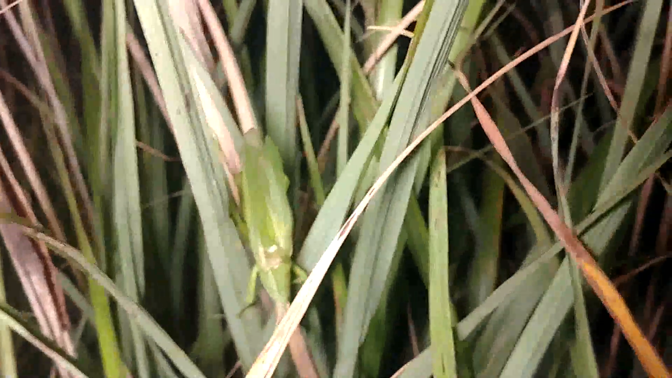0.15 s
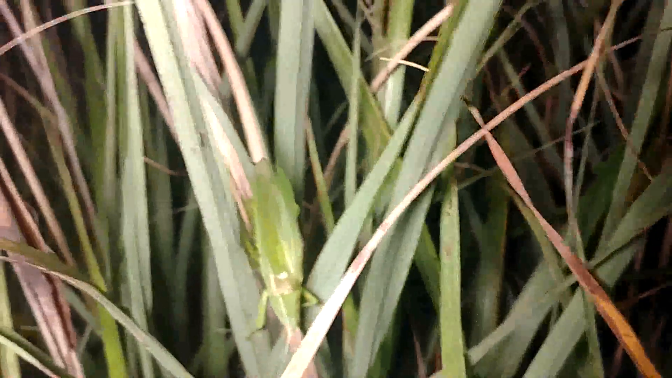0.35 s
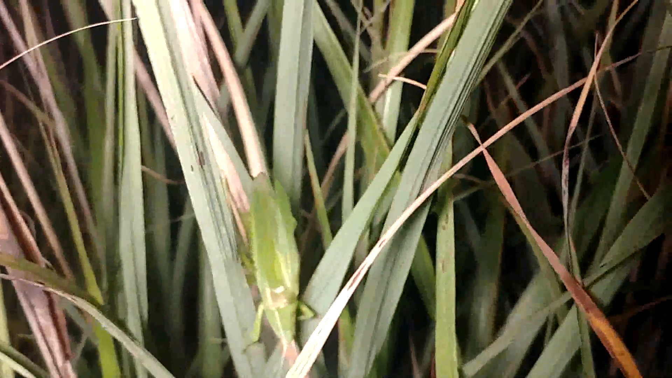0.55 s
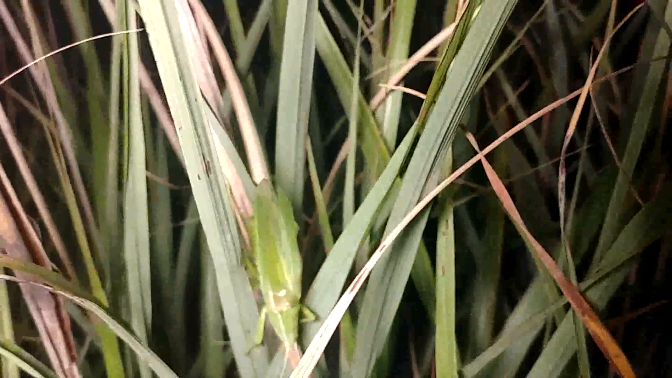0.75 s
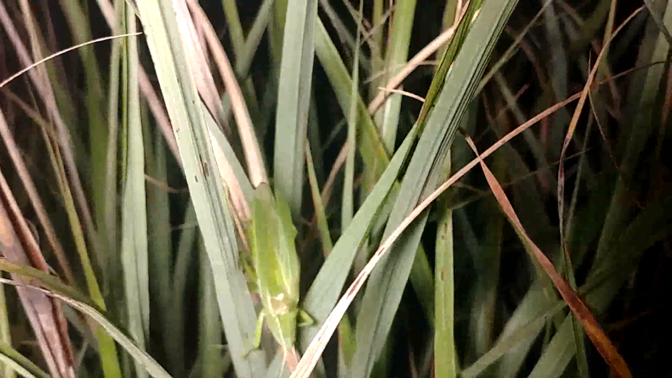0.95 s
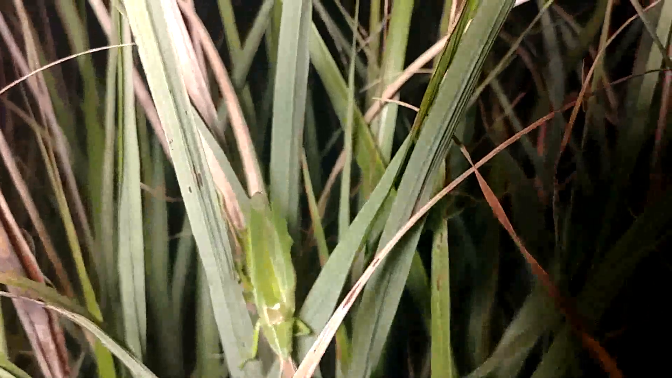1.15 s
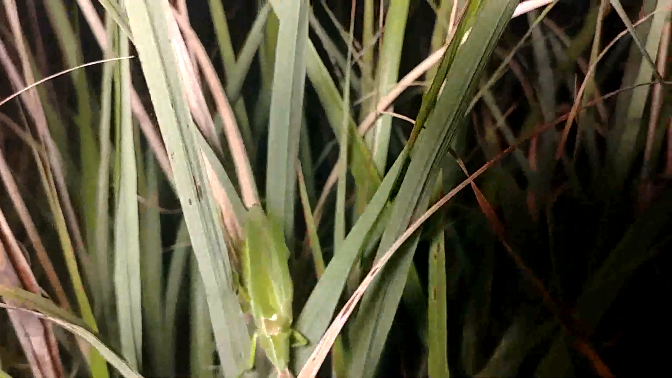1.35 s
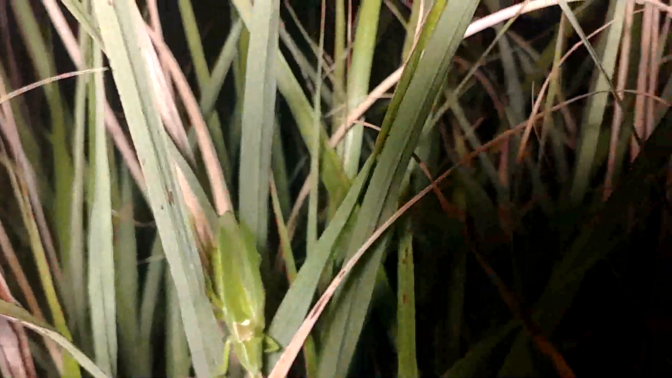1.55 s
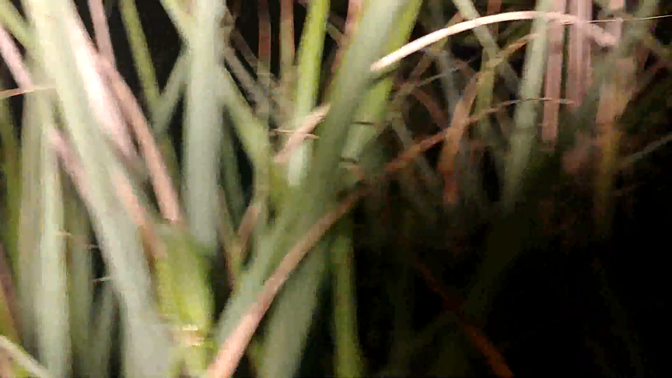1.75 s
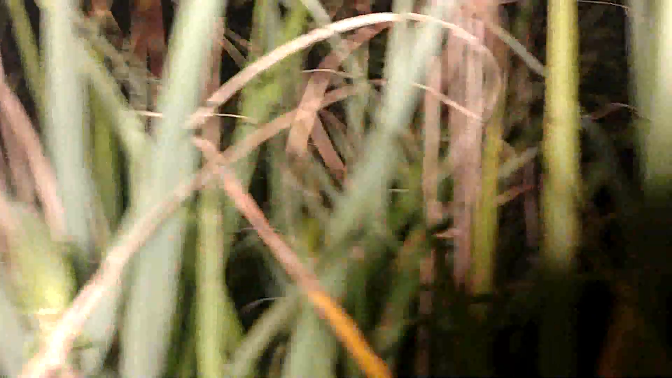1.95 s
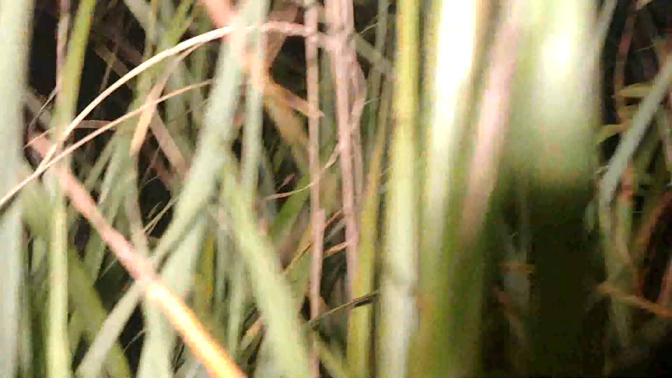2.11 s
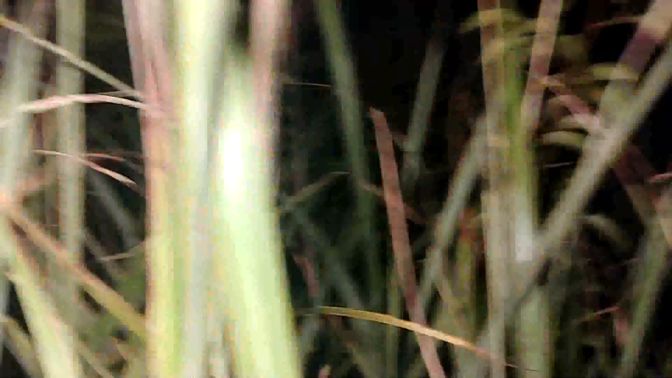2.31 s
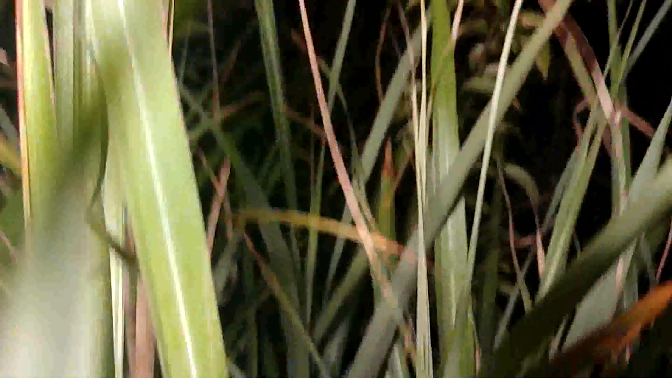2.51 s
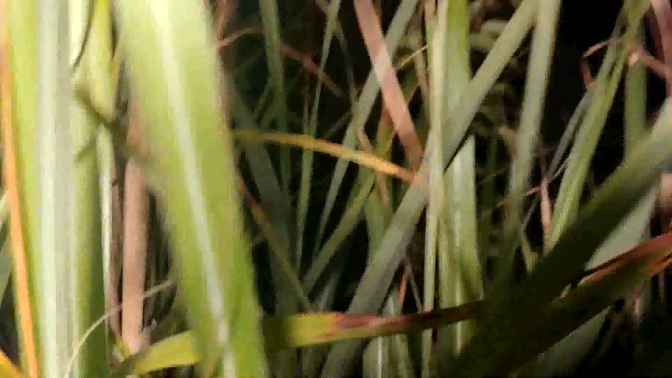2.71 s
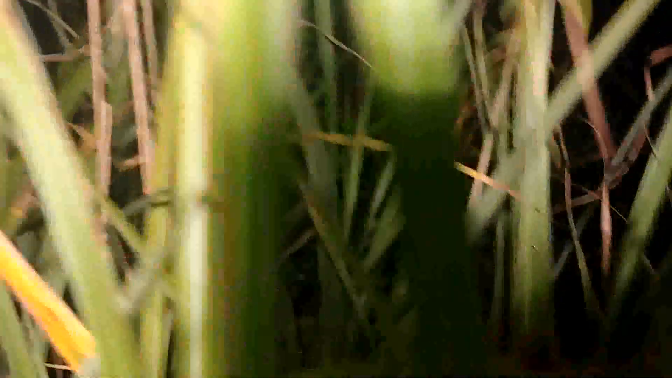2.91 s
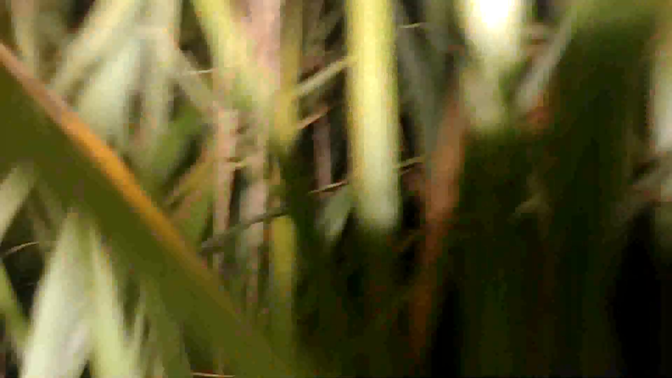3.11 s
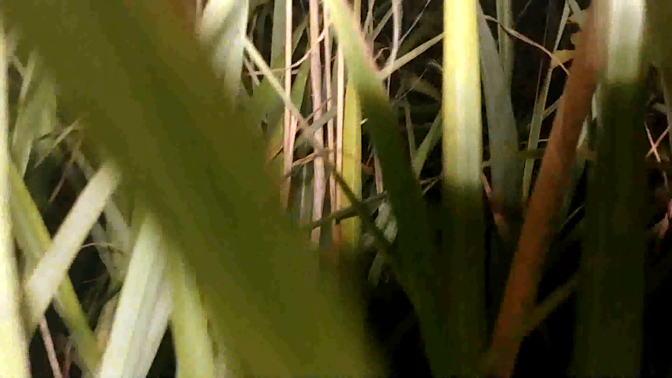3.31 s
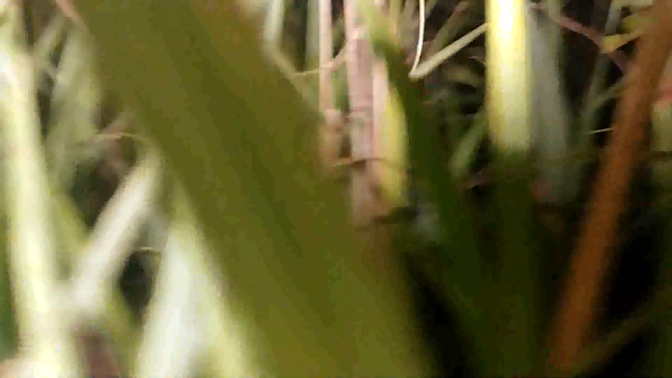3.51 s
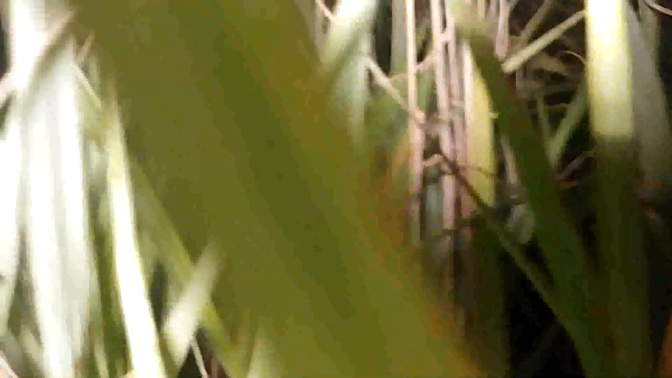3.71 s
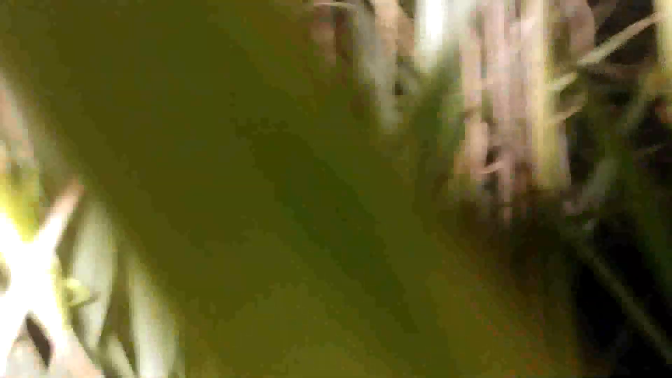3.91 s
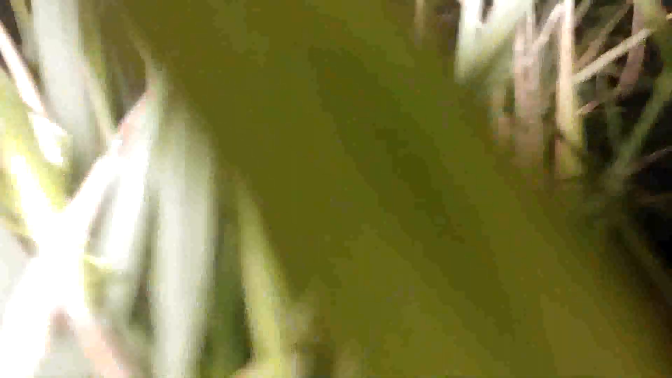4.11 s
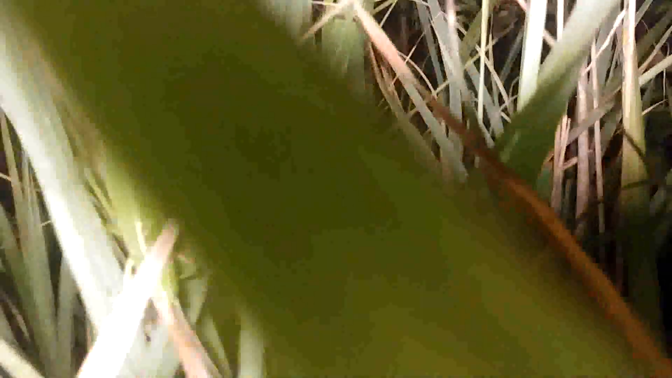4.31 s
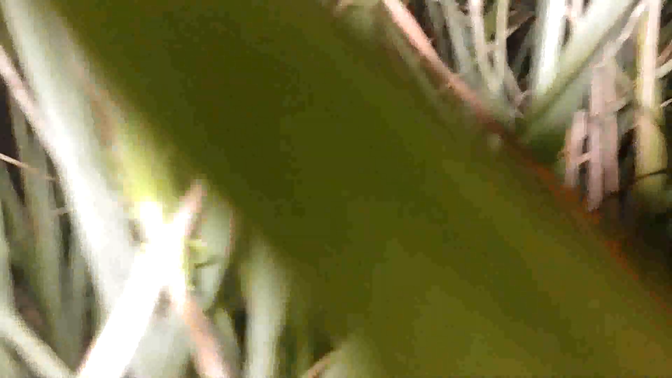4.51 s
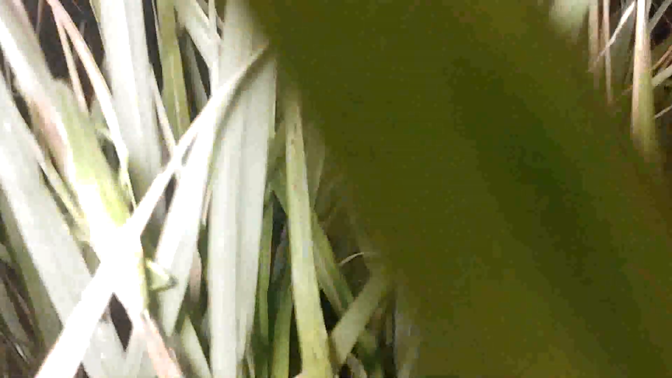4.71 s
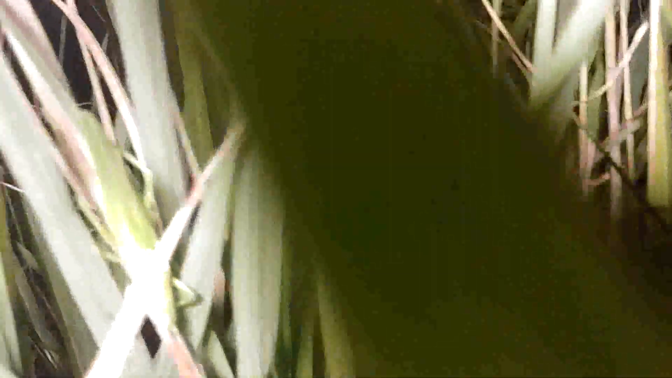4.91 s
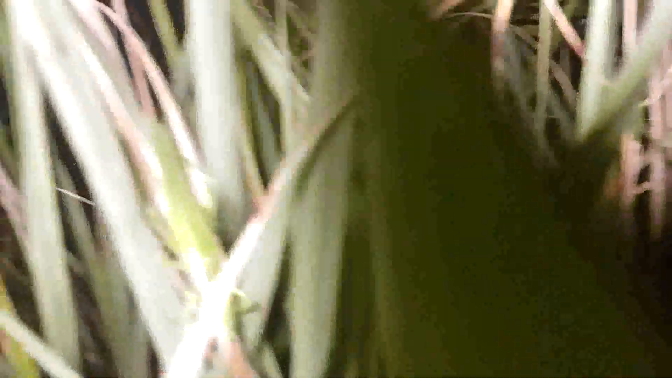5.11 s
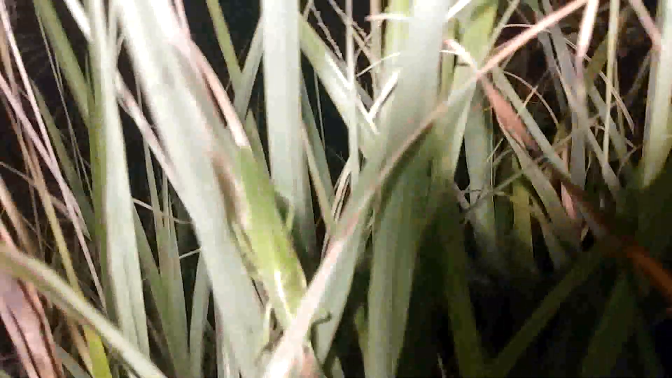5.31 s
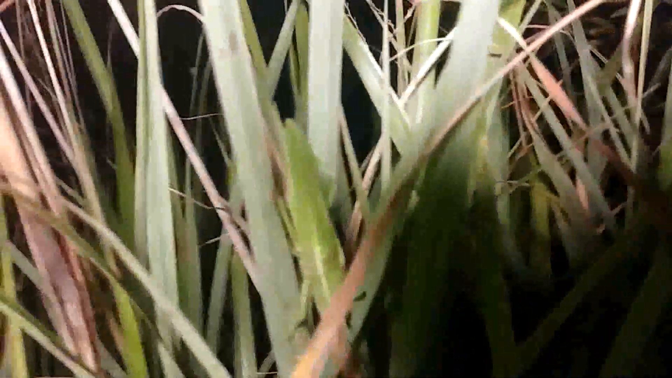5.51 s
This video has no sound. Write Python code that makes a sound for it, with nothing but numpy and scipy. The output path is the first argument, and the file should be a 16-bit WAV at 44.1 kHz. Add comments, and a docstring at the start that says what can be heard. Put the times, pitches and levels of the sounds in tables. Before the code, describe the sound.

A dazzlingly loud, shrill katydid rattle fills the first three seconds, dry and close, coloured by moving grass blades and a buzzing low hum. It quits abruptly with a hand bump and a brief ring in the grass. Much quieter night remains: far katydids shimmering and fading, crickets chirping, a throbbing lower trill, a few tiny far yelps and soft handling bumps on the swaying stereo microphones.

```python
"""A large katydid buzzes close by in tall grass at night while the pair of microphones swings away.
Each wing stroke is a mostly falling chirp echoed by leaves, with noise for the scraper and a summed-cosine hum.
The wings run down and stop at 3.27 s with a bump of the hand; two damped rings make a last twitch at 3.6 s.
What remains is a fading katydid chorus of filtered noise, gliding-sine crickets, a throbbing trill,
a few far yelps of two partials, grass brushes and bumps, over the filtered noise of the night air."""
import sys
import numpy as np
from scipy import signal
from scipy.fft import rfft, irfft
from scipy.io import wavfile
from scipy.ndimage import uniform_filter1d, map_coordinates

SR = 44100
rng = np.random.default_rng(int(sys.argv[2]) if len(sys.argv) > 2 else 0)


def wav_out(sig):
    """Save sig, one row per channel (or a flat mono array), as 16-bit PCM at SR to the path in sys.argv[1]."""
    wavfile.write(sys.argv[1], SR, np.round(np.clip(np.atleast_2d(sig).T, -1, 1) * 32767).astype(np.int16))


N = 244755
TIME = np.arange(N) / SR
STOP = 3.274  # s, the wings stop
WING_RATE = 168.6  # strokes per second before falters, run-down and jitter
# the microphones swing away from the insect: time_s, right_microphone_lag_ms
SWING = [(0, .081), (.25, .08), (.45, .074), (1.3, .074), (1.68, .07), (1.8, .085), (1.92, .116),
         (2.0, .152), (2.15, .2), (2.3, .208), (2.38, .236), (2.53, .31), (2.8, .347), (3.05, .34),
         (3.2, .285)]
# bumps of the holding hand: start_s, envelope_time_s, relative_rub_db, ring_db, ring_hz
BUMPS = [(3.275, 0.016, -37, -33.5, 66), (5.02, 0.037, -53.5, -49, 80), (5.355, 0.042, -46.5, -44, 84)]


def gain_of(db):
    """Level definition: decibels to an amplitude factor."""
    return 10 ** (np.asarray(db) / 20)


def evened(x):
    """Normalization: scales to rms 1."""
    return x / np.sqrt(np.mean(x ** 2) + 1e-20)


def follow(rows, at=TIME):
    """Linear interpolation: the columns of a table as curves over its first column."""
    position, *columns = np.transpose(rows)
    return [np.interp(at, position, column) for column in columns]


def colour(x, points):
    """Spectral shaping: filters by a response over log frequency, then scales to rms 1."""
    hz, db = np.transpose(points)
    shape = np.interp(np.log(np.fft.rfftfreq(N, 1 / SR) + 1), np.log(hz), db)
    return evened(irfft(rfft(x) * gain_of(shape), N))


def noise():
    """Incoherence: white noise, independent left and right."""
    return rng.standard_normal((2, N))


def wander(cutoff_hz):
    """Band limitation: noise below a cutoff makes a random fluctuation of rms 1."""
    spectrum = rfft(rng.standard_normal(N))
    return evened(irfft(spectrum * (np.fft.rfftfreq(N, 1 / SR) < cutoff_hz), N))


def tone(hz):
    """Phase accumulation: a sine that follows a pitch curve."""
    return np.sin(2 * np.pi * np.cumsum(hz) / SR)


def arch(start, length):
    """Half-sine envelope: a smooth swell of height 1."""
    return np.sin(np.pi * np.clip((TIME - start) / length, 0, 1))


def cycle_bump(turns, at, width):
    """Periodic gating: a Gaussian bump at one point of every wing cycle."""
    return np.exp(-(((turns - at + .5) % 1 - .5) / width) ** 2)


def delayed(x, delay_s, order=3):
    """Propagation delay: reads a signal late by a possibly varying time, with spline interpolation."""
    return map_coordinates(x, [np.arange(N) - delay_s * SR], order=order)


def scatter(x, decay):
    """Diffuse scattering: dense echoes off the grass, different for each ear, dying exponentially."""
    t = np.arange(SR // 5) / SR
    tail = rng.standard_normal((2, len(t))) * np.exp(-t / decay)
    return signal.fftconvolve(np.atleast_2d(x), tail / np.linalg.norm(tail[0]), axes=1)[:, :N]


def add(mix, s, sound):
    """Superposition: lays a sound into the mix at a time."""
    part = mix[round(s * SR):][:len(sound)]
    part += sound[:len(part)]


def katydid(grass_db=-17, field_db=-21):
    """Stridulation: one wing cycle drives catch, chirp, rasp and hum; the grass rings briefly after the stop."""
    turns = np.cumsum(wing_rate() * (1 + .006 * wander(80))) / SR
    sounding = np.clip((STOP - TIME) / 0.006, 0, 1)
    scrape = (graze(catch(turns) + rasp(turns)) + hum(turns)) * sounding
    chirps = (chirping(turns) + sheen(turns)) * sounding
    # the broad scrape spreads into the grass more than the beamed chirp
    near_grass = gain_of(grass_db) * scatter(4.27 * scrape + 1.13 * chirps, decay=0.013)
    field = gain_of(field_db) * scatter(chirps, decay=0.057)
    return scrape + chirps + near_grass + field


def wing_rate(run_down_s=0.079, run_down_rate=57):
    """Frequency modulation: a steady beat, less the falters and the final run-down in strokes per second."""
    # the wings falter and recover: start_s, length_s, lost_strokes_per_s
    falters = [(2.251, 0.17, 14), (2.333, 0.42, 5.5), (2.656, 0.75, 2.2)]
    run_down = np.clip(1 - (STOP - TIME) / run_down_s, 0, 1)
    lost_rate = sum(lost * arch(s, length) for s, length, lost in falters)
    return WING_RATE - lost_rate - run_down_rate * run_down


def chirping(turns, song_db=-9.5, tilt_db=4, perch_db=-22, facing_db=-26, averted_db=-14):
    """Comb interference: each microphone has its own tilt and ridges; off axis the side echoes grow."""
    # a blade beside each microphone combs the song: time_s, left_dip_hz, left_echo_share,
    # left_added_tilt_db_per_octave, right_dip_hz, right_echo_share, right_added_tilt_db_per_octave
    blade_curves = [(0, 8740, 0.083, -7, 8850, 0.17, 3), (.3, 8800, 0.22, -12, 9000, 0.11, 7),
                    (1.0, 8620, 0.4, -16, 8800, 0.11, 10), (1.2, 8500, 0.14, 2, 8450, 0.14, 12),
                    (1.45, 8580, 0.16, -9.5, 8800, 0.16, 12), (1.7, 8440, 0.37, -7, 8900, 0.34, -1),
                    (1.92, 8570, 0.17, 0, 8670, 0.17, -8), (2.03, 8370, 0.29, 8, 8600, 0.35, -1),
                    (2.25, 8600, 0.19, -5, 8960, 0.53, -6), (2.38, 8550, 0.15, -7, 8830, 0.18, -3),
                    (2.5, 8500, 0.13, -7, 9100, 0.39, -25), (2.72, 9140, 0.098, -11, 9000, 0.13, -19),
                    (2.95, 8160, 0.15, -9, 8420, 0.24, -16), (3.12, 8580, 0.23, -7, 8334, .42, -21),
                    (3.27, 9100, .15, 2, 8350, .25, -26)]
    hz, chirps = strokes(turns, jitter_hz=22.1, size_db=.5)
    octaves = np.log2(hz / 8500)
    controls = np.reshape(follow(blade_curves), (2, -1, N))
    echo_db = facing_db + (averted_db - facing_db) * averted()
    out = []
    for side, (dip_hz, share, tilt) in zip(microphones(leaves(chirps.real, perch_db)), controls):
        ridged = blade(side * gain_of((tilt_db + tilt) * octaves), dip_hz, share)
        level_db = song_db + 0.4 * wander(4.0)
        out.append(leaves(ridged, echo_db) * gain_of(level_db))
    return np.array(out)


def strokes(turns, jitter_hz, size_db):
    """Tooth-by-tooth excitation: pitch is the tooth rate, and every stroke has its own phase, pitch and size."""
    # one stroke of scraper over file: cycle_share, tooth_rate_hz, relative_level_db
    stroke = [(0, 9512, -25), (.06, 9516, -7), (.15, 9359, 0.5), (.24, 8859, -1.5), (.32, 8180, -1.5),
              (.42, 7918, -3), (.52, 7820, -12), (.62, 8168, -24), (.72, 8179, -28), (.86, 8038, -11.5),
              (1, 8497, -14.5)]
    index = turns.astype(int)
    start, detune, size = rng.standard_normal((index[-1] + 1, 3))[index].T
    hz, db = follow(stroke, turns % 1)
    hz = hz + jitter_hz * detune
    phase_turns = np.cumsum(hz) / SR + start
    return hz, gain_of(db + size_db * size) * np.exp(2j * np.pi * phase_turns)


def leaves(chirps, echo_db, far_ms=2.8, drift_ms=0.039):
    """Multipath reflection: five echoes drift as the hand moves; a running rms evens the level."""
    paths_ms = [ms + drift_ms * wander(1.5) for ms in np.linspace(far_ms / 2, far_ms * 2, 5)]
    echo = delayed(chirps, np.array(paths_ms) / 1000).sum(0)
    heard = chirps + gain_of(echo_db) * echo
    return heard / np.sqrt(uniform_filter1d(heard ** 2, size=2100) + 1e-9)


def blade(x, dip_hz, share, order=9):
    """Destructive interference: an echo 9.5 periods late makes a dip with a ridge on either side."""
    return x + share * delayed(x, (order + .5) / dip_hz)


def microphones(x):
    """Arrival-time difference: the right microphone hears the insect later and with opposite sign."""
    return np.array([x, -delayed(x, follow(SWING)[0] / 1000, order=5)])


def averted(facing_ms=0.075, averted_ms=0.35):
    """Direction from time lag: how far the microphones have turned off the insect, 0-1."""
    return np.clip((follow(SWING)[0] - facing_ms) / (averted_ms - facing_ms), 0, 1)


def sheen(turns, sheen_db=-22.5, averted_db=-14, floor=0.56, at=0.87, width=0.2):
    """Resonance and directivity: strokes shake the wing's upper resonance, which fades off axis."""
    # the upper resonance, beamed straight ahead: frequency_hz, relative_density_db_per_hz
    resonance = [(11000, -64), (13300, -17), (14400, 5), (15000, -3), (15700, 2), (16500, -5.5)]
    push = floor + cycle_bump(turns, at, width)
    ringing = microphones(colour(rng.standard_normal(N) * push, resonance))
    return ringing * gain_of(sheen_db + averted_db * averted())


def rasp(turns, rasp_db=-23.0, averted_db=4.5, floor=0.98, at=0.057, width=0.083, flicker_db=1.33,
         direct=0.89, beam_hz=7000):
    """Friction noise and coherence: hiss peaks at the bite; its treble is largely shared by both microphones."""
    # the rasp from the front, then from the side: frequency_hz, relative_density_db_per_hz
    front = [(100, -19), (1000, -8.5), (3000, -11.5), (4500, -10.5), (6000, -9.5), (7200, 5), (10300, 2),
             (11600, -1), (13300, 3), (14600, -2), (15800, 4)]
    side = [(100, -7.5), (1000, -29), (3000, -16), (4500, -14), (6000, -8.5), (7200, -21), (10200, 11.5),
            (11200, -37), (12800, 3), (14200, 2), (15800, 1)]
    shared = direct / (1 + (beam_hz / (np.fft.rfftfreq(N, 1 / SR) + 1)) ** 8)
    coherent = shared * rfft(microphones(rng.standard_normal(N)))
    diffuse = np.sqrt(1 - shared ** 2) * rfft(noise())
    hiss = irfft(coherent + diffuse, N)
    scrape = hiss * (floor + cycle_bump(turns, at, width)) * gain_of(flicker_db * wander(49))
    off = averted()
    dull = 0.47 * off
    blend = (1 - dull) * colour(scrape, front) + dull * colour(scrape, side)
    return blend * gain_of(rasp_db + averted_db * off)


def catch(turns, catch_db=-30, averted_db=4, at=1.0, width=0.0063, size_db=2):
    """Repeated excitation: each stroke opens on the same few teeth, so its first scrape repeats."""
    # the scraper's first catch on the file: frequency_hz, relative_density_db_per_hz
    catch_spectrum = [(300, -42), (1500, -35), (3000, -16), (7000, -13), (10500, -16), (11400, 13),
                      (12500, 7), (13300, 6), (14000, 18.5), (15800, 11.5)]
    cycle = (turns - at + .5) % 1 - .5
    tooth_index = ((cycle + .5) * (SR // 168)).astype(int)
    teeth = rng.standard_normal(SR // 100)[tooth_index]
    burst = teeth * cycle_bump(turns, at, width) * gain_of(size_db * wander(150))
    return microphones(colour(burst, catch_spectrum)) * gain_of(catch_db + averted_db * averted())


def graze(x, share=0.22, path_ms=0.374, sway_ms=0.11):
    """Comb filtering: a blade's echo combs the scrape; the comb sweeps more as the microphones turn off axis."""
    delay_ms = path_ms + sway_ms * averted() * wander(1.7)
    echo = np.array([delayed(side, delay_ms / 1000) for side in x])
    return (x + share * echo) / np.hypot(1, share)


def hum(turns, at=0.2995, size_db=2.14, late_ms=0.67):
    """Harmonic series: cosines at the wing rate stand for the hum of each overloaded microphone."""
    # overtones of the hum in each microphone: frequency_hz, relative_level_db
    left_stack = [(340, -2.5), (505, -7), (675, -6), (840, -2.5), (1180, -1.5), (1520, -2), (1850, -8),
                  (2700, -17)]
    right_stack = [(340, -1), (505, -6.5), (675, -3), (840, -7.5), (1010, -4), (1180, -8.5), (1350, -8),
                   (1520, -10), (2700, -16)]
    # hum level: time_s, left_fundamental_db, left_overtones_db, right_fundamental_db, right_overtones_db
    hum_levels = [(0, -48.5, -51, -51.5, -42.5), (1.0, -53, -55, -52, -42.5), (1.35, -49, -54, -46, -39.5),
                  (1.62, -50, -54, -46, -43.5), (1.8, -51, -54, -48, -46), (1.98, -47, -46.5, -49, -48),
                  (2.13, -40, -36.5, -45.5, -51), (2.32, -46.5, -49.5, -49, -50.5),
                  (2.46, -49, -47.5, -50.5, -50), (2.57, -42.5, -37.5, -56, -49),
                  (2.95, -43, -38, -52.5, -54), (3.11, -43, -36, -52, -47.5), (3.27, -38, -39, -53, -47)]
    size = gain_of(size_db * wander(80))
    levels = np.reshape(follow(hum_levels), (2, 2, N))
    cycles = [turns - at, turns - at - late_ms * WING_RATE / 1000]
    out = []
    for cycle, (low_db, stack_db), points in zip(cycles, levels, [left_stack, right_stack]):
        harmonics = np.arange(2, 17)
        heights = gain_of(np.interp(harmonics * WING_RATE, *np.transpose(points)))
        stack = sum(height * np.cos(2 * np.pi * n * cycle) for n, height in zip(harmonics, heights))
        fundamental = evened(np.cos(2 * np.pi * cycle)) * gain_of(2 * wander(10))
        out.append(gain_of(low_db) * fundamental + gain_of(stack_db) * evened(stack) * size)
    return np.array([out[0], -out[1]])


def twitch(snap_db=-18, right_db=-5.0, right_snap_db=-20):
    """Damped free vibration: two catches of the scraper ring the wing; the snap is strongest on the left."""
    # the last twitch of the wings: start_s, relative_level_db, decay_s
    twitches = [(3.615, -1.5, 0.00034), (3.6161, -4, 0.0009)]
    # the dry snap of each catch: frequency_hz, relative_density_db_per_hz
    snap_spectrum = [(200, -10), (800, -2), (1700, 9), (2600, 9.5), (4200, 7), (5500, -2), (15000, 4.5)]
    modes = [(8100, 0), (9150, -9), (13300, -9)]  # frequency_hz, relative_level_db
    out = np.zeros((2, N))
    for s, db, decay in twitches:
        t = np.maximum(TIME - s, 0)
        ring = sum(gain_of(level) * np.sin(2 * np.pi * hz * t) for hz, level in modes)
        swell = gain_of(db) * 2 * t / decay * np.exp(-t / decay)
        snap_envelope = gain_of(snap_db) * np.exp(-t / 0.00079) * (t > 0)
        snap = colour(rng.standard_normal(N), snap_spectrum) * snap_envelope
        out += swell * ring * gain_of([[0], [right_db]]) + snap * gain_of([[0], [right_snap_db]])
    return out


def chorus(level_db=-27.0, fade_db_per_s=1.18, pan_db=4.0, throb=0.24):
    """Amplitude modulation: far katydids smear into throbbing noise that slowly fades after the near one stops."""
    # the far katydids: frequency_hz, relative_density_db_per_hz
    chorus_spectrum = [(6000, -63), (6600, -31), (7000, -19.5), (7450, -2.5), (8000, 3.5), (8350, 2.5),
                       (8900, -5.5), (9450, -7), (9900, -22), (10300, -34), (10800, -80), (12500, -50.5),
                       (14500, -32.5), (15800, -42)]
    beat = 1 + throb * tone(170.0 + wander(37.0))
    level = level_db - fade_db_per_s * np.maximum(TIME - STOP, 0) + .5 * wander(25)
    return colour(noise() * beat, chorus_spectrum) * gain_of(level + np.array([[.5], [-.5]]) * pan_db)


def crickets():
    """Superposition: two crickets chirp over a noise band of others merged by distance."""
    # runs of soft, then of quick falling chirps:
    # first_s, end_s, period_s, syllables, relative_level_db, pitch_hz
    soft_chirps = [(3.283, 3.72, 0.095, 4, -43, 5300), (3.983, 4, 0.1, 2, -47, 5200),
                   (4.068, 4.72, 0.119, 5, -42.5, 5180), (4.793, 5.0, 0.089, 2, -45, 5130),
                   (5.25, 5.53, 0.115, 3, -46, 5150)]
    quick_chirps = [(3.315, 3.87, 0.086, 3, -46.5, 5620), (3.922, 4.24, 0.088, 3, -41.5, 5620),
                    (4.66, 5.53, 0.083, 3, -43, 5560)]
    # more crickets, merged by distance: frequency_hz, relative_density_db_per_hz
    far_spectrum = [(4000, -40), (4700, -14), (5200, 1), (5750, -1), (6300, -12), (7000, -41)]
    soft = cricket(soft_chirps, fall_hz=745, spacing=0.012, length=0.0083, echo_db=0, decay=0.017)
    quick = cricket(quick_chirps, fall_hz=1000, spacing=0.01, length=0.0081, echo_db=0, decay=0.018)
    far = gain_of(-56) * colour(noise(), far_spectrum)
    return (gain_of(-1.0) * soft + gain_of(-0.5) * quick + far) * gain_of([[1.5], [-1.5]])


def cricket(runs, fall_hz, spacing, length, echo_db, decay, uneven_db=2.0, detune_hz=90):
    """Frequency sweep: steady chirps of a few steeply falling syllables, blurred by the grass."""
    out = np.zeros(N)
    u = np.arange(0, 1, 1 / (length * SR))  # share of the syllable
    for first, end, period, count, db, hz in runs:
        for s in np.arange(first, end, period):
            for k, (size, detune, late) in enumerate(rng.standard_normal((int(count), 3))):
                swell = np.sin(np.pi * (k + 1) / (count + 1)) * gain_of(db + uneven_db * size)
                pitch = hz + detune_hz * detune - fall_hz * (u - .5)
                add(out, s + spacing * (k + .08 * late), swell * tone(pitch))
    return out + gain_of(echo_db) * scatter(out, decay)


def trill(trill_db=-1.5, hz=3400, spread_hz=110, lull=0.18, beat_hz=63, uneven_db=1.5):
    """Random frequency modulation: a lower insect trill, blurred by distance, throbs over a quiet floor."""
    # swells of the trill: start_s, length_s, relative_level_db
    trills = [(3.524, 0.43, -55.5), (3.99, 0.25, -56), (4.37, 0.39, -59.5), (4.95, 0.27, -57)]
    level = sum(gain_of(db + trill_db) * abs(arch(s, length)) ** 0.39 for s, length, db in trills)
    level = (level + lull * level.max()) * gain_of(uneven_db * wander(30))
    ring = np.array([tone(hz + spread_hz * wander(463)) for side in range(2)])
    throb = 1 + .75 * tone(beat_hz + 3 * wander(8))
    return level * throb * ring


def yelps():
    """Harmonic partials: short far calls, hoarse from pitch jitter, with a weak octave overtone."""
    # a far animal's yelps: start_s, length_s, mean_pitch_hz, relative_level_db, overtone_db
    yelp_calls = [(3.924, 0.04, 1000, -49, -21), (5.222, 0.04, 1090, -55, -12),
                  (5.247, 0.048, 1020, -53, -15)]
    out = np.zeros(N)
    for s, length, hz, db, overtone_db in yelp_calls:
        pitch = hz * (1 + .042 * wander(350))
        voice = tone(pitch) + gain_of(overtone_db) * tone(2 * pitch)
        out += gain_of(db) * arch(s, length) * voice
    return 0.87 * out + .5 * scatter(out, decay=0.01)


def handling():
    """Contact noise: bumps of the hand rub and ring, and grass brushes by."""
    # spectra of the rub and of the brush: frequency_hz, relative_density_db_per_hz
    rub_spectrum = [(20, -44), (50, 6), (80, 11), (130, -4), (250, -21), (1000, -41), (8000, -68)]
    brush_spectrum = [(40, -13), (150, 1), (380, -1), (800, -7), (2500, -17), (6000, -18), (15000, -42)]
    # grass brushing by: start_s, decay_s, relative_level_db
    brushes = [(3.665, 0.011, -65), (4.165, 0.03, -57.5), (4.32, 0.021, -65), (4.58, 0.046, -77),
               (4.915, 0.017, -68)]
    rubs = gain_of(11.0) * touches(BUMPS, rub_spectrum, rise=0.0036)
    grass = gain_of(13.0) * touches(brushes, brush_spectrum, rise=0.0022)
    return thumps() + rubs + grass


def thumps():
    """Damped oscillation: each bump also rings low, swelling to its envelope peak and dying away."""
    out = np.zeros(N)
    for s, peak_s, _, db, hz in BUMPS:
        t = np.maximum(TIME - s, 0)
        envelope = (t / peak_s) ** 2 * np.exp(2 - 2 * t / peak_s)
        out += gain_of(db) * envelope * np.sin(2 * np.pi * hz * t)
    return out


def touches(rows, spectrum, rise):
    """Exponential rise and decay: soft contacts as swelling and fading noise."""
    level = np.zeros(N)
    for s, decay, db, *_ in rows:
        t = np.maximum(TIME - s, 0)
        level += gain_of(db) * (1 - np.exp(-t / rise)) * np.exp(-t / decay)
    return level * colour(noise(), spectrum)


def night_air():
    """Stationary noise: the steady background of the night."""
    # the background: frequency_hz, relative_density_db_per_hz
    night_spectrum = [(20, -19), (45, -9), (75, 7.5), (120, -11), (250, -11), (600, -15.5), (1500, -22.5),
                      (3000, -21), (4000, -14), (6500, -35), (11000, -39), (16000, -10.5)]
    return gain_of(-51.5) * colour(noise(), night_spectrum)


def scene():
    """Superposition: the near singer over the sounds of the night."""
    near = katydid() + twitch()
    far = chorus() + crickets() + trill() + yelps()
    return near + far + handling() + night_air()


def record(dry):
    """Saturation and band limitation: peaks clip at full scale, then a lowpass removes the top."""
    lowpass = signal.firwin(511, 15900, window=("kaiser", 9), fs=SR)  # cutoff in Hz
    return signal.oaconvolve(np.clip(dry, -1, 1), lowpass[None], "same")


dry = scene()
out = record(dry)
wav_out(out)
```